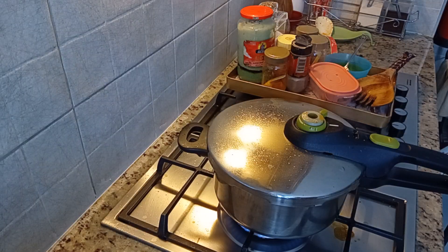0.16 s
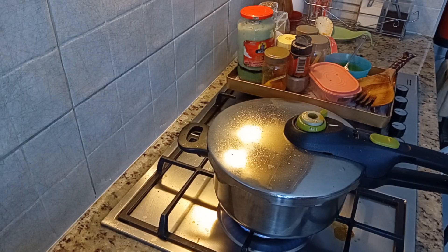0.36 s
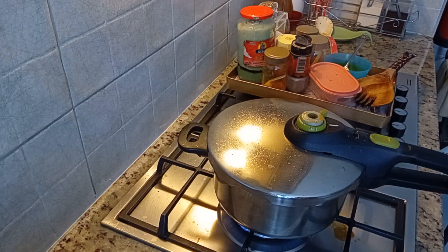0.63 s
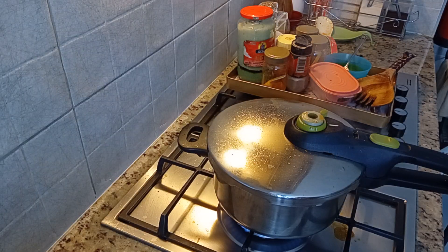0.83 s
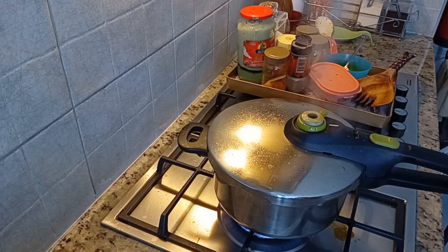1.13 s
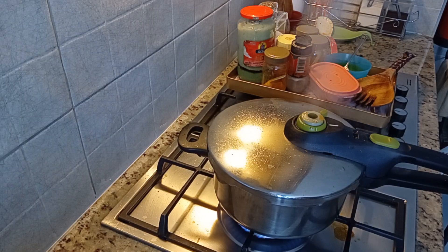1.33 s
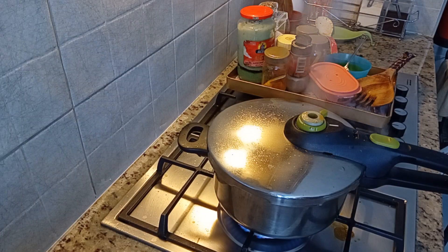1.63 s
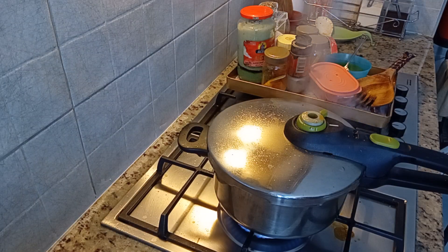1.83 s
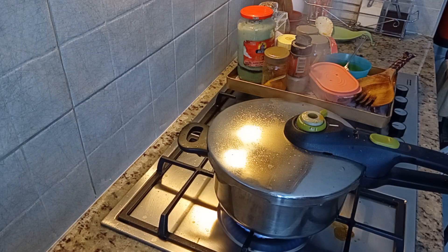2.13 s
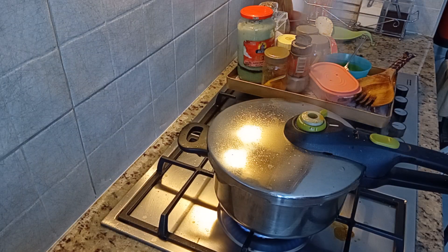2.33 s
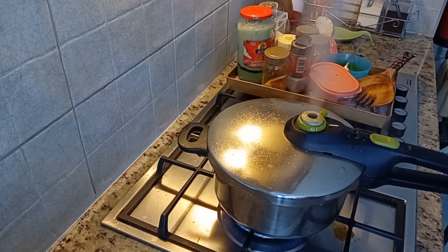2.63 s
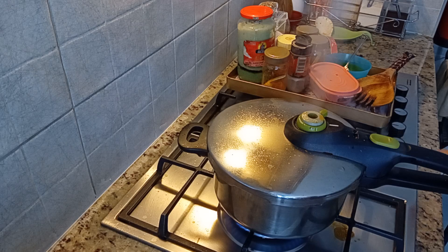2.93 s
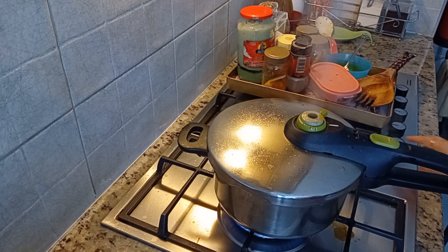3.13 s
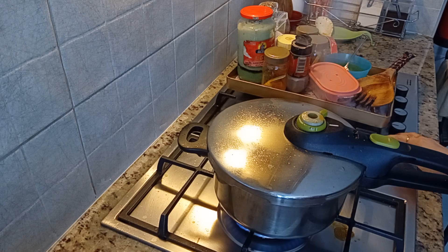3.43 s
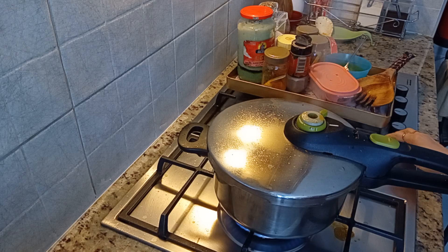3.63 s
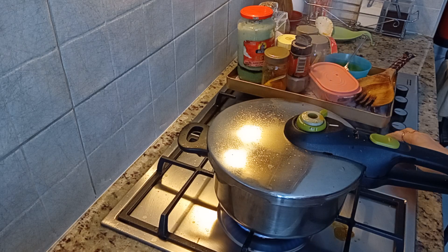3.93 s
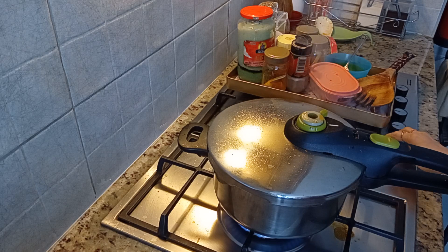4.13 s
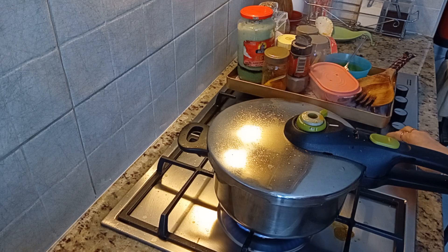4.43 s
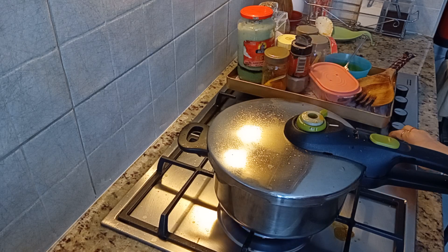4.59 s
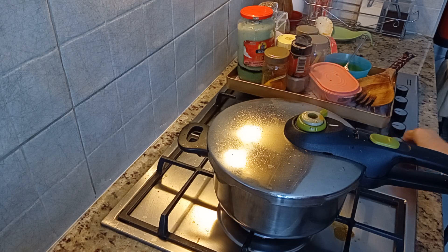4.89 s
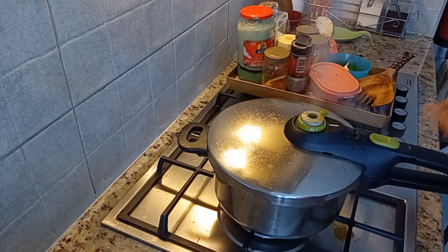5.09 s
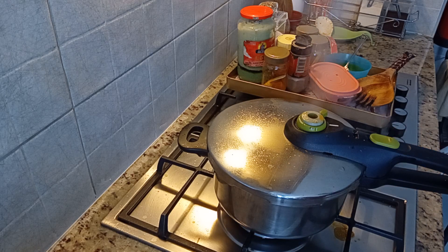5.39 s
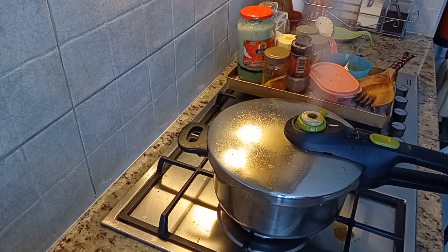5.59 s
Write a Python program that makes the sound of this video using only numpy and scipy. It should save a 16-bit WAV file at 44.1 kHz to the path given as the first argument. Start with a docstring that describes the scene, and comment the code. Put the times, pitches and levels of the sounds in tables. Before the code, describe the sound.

Close in a tiled kitchen, one microphone picks up a pressure cooker venting a constant, very bright hiss. Faint high tones flicker at first, a tiny rough squeak comes near one second, then a thin, trembling whistle locks in and keeps swelling and fading. Near the end it sinks while a weak breathy tone climbs. The gas flame murmurs very quietly below, with a few soft low bumps.

```python
"""Steam hisses from a pressure cooker on a gas hob in a tiled kitchen corner, heard by one microphone. The jet
is coloured noise ringing the valve cavity and lid; thin edge tones waver and beat with their echoes. The burner
murmurs underneath as low noise, with a faint hum and soft bumps. Brief swelling sines are other valve
resonances, low gurgles and the dying tail of one faint squeak of partials and rasping air. The unsteady main
whistle then locks in, throbs most when the jet is upset, and sinks as a breathy tone climbs."""
import sys
import numpy as np
from scipy import signal
from scipy.fft import rfft, irfft
from scipy.io import wavfile
from scipy.ndimage import uniform_filter1d

SR = 44100
rng = np.random.default_rng(int(sys.argv[2]) if len(sys.argv) > 2 else 0)


def waveform_to_disk(signal):
    """Save audio, clipped to [-1, 1], as 16-bit WAV at the path in sys.argv[1]."""
    frames = np.transpose(np.atleast_2d(signal))
    scaled = np.clip(frames, -1, 1) * 32767
    samples = np.round(scaled).astype(np.int16)
    wavfile.write(sys.argv[1], SR, samples)


N = 253575
TIME = np.arange(N) / SR  # s
FREQ = np.maximum(np.fft.rfftfreq(N, 1 / SR), 1)  # Hz, kept above zero for the logarithm


def undb(db):
    """Decibels to gain."""
    return 10 ** (np.asarray(db) / 20)


def unit(x):
    """Scale to rms 1."""
    return x / np.sqrt(np.mean(x ** 2))


def curves(rows):
    """Each column of a control table after the time, joined by straight lines, sample by sample."""
    s, *columns = np.transpose(rows)
    return [np.interp(TIME, s, column) for column in columns]


def shaped_noise(gain):
    """White noise with its spectrum multiplied by a gain curve, rms 1."""
    return unit(irfft(rfft(rng.standard_normal(N)) * gain, N))


def walk(rate):
    """Smooth chance motion of rms 1, up to about rate changes a second."""
    return shaped_noise(1 / (1 + (FREQ / rate) ** 4))


def noise(points, modes=()):
    """Turbulence of rms 1 with a broad colour and optional narrow peaks and dips."""
    hz, db = np.transpose(points)
    colour = np.interp(np.log(FREQ), np.log(hz), db)
    for centre, width, lift in modes:
        colour = colour + lift / (1 + (2 * (FREQ - centre) / width) ** 2)
    return shaped_noise(undb(colour))


def ringing(hz, width):
    """Turbulence ringing in one narrow resonance, rms 1."""
    return shaped_noise(1 / (1 + ((FREQ - hz) / (0.65 * width)) ** 2))


def swell(middle, length):
    """A smooth bell-shaped rise and fall, at 0.61 of its peak half a length either side."""
    return np.exp(-2 * ((TIME - middle) / length) ** 2)


def tiles(x, db, count=6):
    """A few discrete reflections off the wall and counter, 2-14 ms late, comb the hiss."""
    lags = rng.integers(SR // 500, SR // 70, count)
    echoes = sum(np.roll(x, lag) for lag in lags) / np.sqrt(count)
    return (x + undb(db) * echoes) / np.hypot(1, undb(db))


def kitchen(x, early_db, late_db, t60, early_s=0.01):
    """Direct sound, a quick cluster of echoes from tiles and lid, and the room's tail."""
    t = TIME[:SR // 2]
    early, late = rng.standard_normal((2, len(t))) * (t > .001)
    early = early * np.exp(-t / early_s)
    late = late * undb(-60 * t / t60)
    response = undb(early_db) * early / np.linalg.norm(early)
    response += undb(late_db) * late / np.linalg.norm(late)
    response[0] = 1  # the direct path
    return signal.fftconvolve(x, response / np.linalg.norm(response))[:N]


def edge_tone(rows, waver, waver_rate, echo_db, partials=((1, 0),), throb=1, wander=0.002197):
    """Vortex tone whose pitch wanders and trembles with the turbulence; its echoes beat with it."""
    hz, db = curves(rows)
    # waver and wander are shares of the pitch
    pitch = hz * (1 + waver * walk(waver_rate) + wander * walk(13.86))
    phase = 2 * np.pi * np.cumsum(pitch) / SR
    source = sum(undb(partial_db) * np.sin(k * phase) for k, partial_db in partials)
    tone = kitchen(throb * source, echo_db, late_db=-6.0, t60=0.54)
    # the quick beats stay, while the slow loudness follows the blowing strength
    tone = tone / np.sqrt(uniform_filter1d(tone ** 2, size=2200) + 1e-9)
    during = (TIME >= rows[0][0]) & (TIME <= rows[-1][0])
    sounding = uniform_filter1d(1. * during, size=900)  # 20 ms fades
    return tone * sounding * undb(db)


def steam(patchy_db=3):
    """Jet noise and two cavity resonances flutter with the flow; the lid's resonances come and go."""
    # steam flow: (time [s], base jet level [dB], base cavity hiss level [dB])
    flow = [(0, -46.5, -36.5), (.8, -46, -36.5), (1.3, -46, -36.5), (2.1, -44, -37), (2.6, -44.5, -36.5),
            (3.4, -45, -36.5), (4.2, -45, -36.5), (5, -44, -36.5), (5.75, -45.5, -36)]
    # spectrum of the open jet: (frequency [Hz], relative level [dB per Hz])
    jet_colour = [(350, -24), (700, -16.5), (950, -9.5), (1200, -8.5), (1550, -9.5), (2200, -10.5),
                  (2500, -6), (3100, -7), (4000, -6.5), (5000, 0.5), (5700, 1.5), (6600, 7), (8300, -5),
                  (11000, -41)]
    # broad main resonance of the valve cavity: (frequency [Hz], relative level [dB per Hz])
    cavity_colour = [(7800, -56), (8600, -17.5), (9050, -7.5), (9200, 1), (9500, 2.5), (10400, 3),
                     (11100, -1.5), (11850, -7.5), (12150, -16.5), (13900, -20), (16000, -10.5)]
    # fine peaks and dips of the cavity: (centre [Hz], width [Hz], lift [dB])
    cavity_modes = [(9570, 110, 5.5), (10310, 96, 6), (10320, 33, -14), (11540, 25, -18), (11850, 120, -7),
                    (12450, 260, 7.5), (11800, 80, 1)]
    # upper resonance of the valve cavity: (frequency [Hz], relative level [dB per Hz])
    sizzle_colour = [(12500, -45), (14000, -19), (14500, -7.5), (15100, -1), (15700, 0)]
    # narrow resonances of lid and valve: (centre [Hz], nominal width [Hz], relative level [dB])
    lid_modes = [(745, 38, -78.5), (961, 170, -68.5), (1135.4, 24, -68.5), (1916, 54, -67.5),
                 (2414, 47, -65.5), (3398, 40, -63), (3890, 48, -62), (4168, 48, -62), (5140, 80, -61.5),
                 (6780, 77, -56)]
    jet_db, cavity_db = curves(flow)
    jet = noise(jet_colour) * undb(jet_db + .5 * walk(16))
    cavity = noise(cavity_colour, cavity_modes) * undb(cavity_db + 0.56 * walk(25))
    # the upper resonance is the less steady one
    sizzle = noise(sizzle_colour) * undb(cavity_db + 0.5 + 1.1 * walk(22))
    lid = sum(ringing(hz, width) * undb(db + patchy_db * walk(12.7)) for hz, width, db in lid_modes)
    return tiles(jet + cavity + sizzle, db=-9.5) + undb(-2.5) * lid


def early_tones(locks_in):
    """Weak edge tones drift apart until the main whistle locks in."""
    # (first pitch [Hz], last pitch [Hz], first base level [dB], last base level [dB])
    drifts = [(4850, 4720, -57.5, -53.5), (6580, 6880, -51, -49.5)]
    tones = 0
    for hz0, hz1, db0, db1 in drifts:
        rows = [(0, hz0, db0), (locks_in, hz1, db1)]
        flicker = undb(3.6 * walk(8.6))
        tones = tones + flicker * edge_tone(rows, waver=0.00494, waver_rate=58, echo_db=4.0)
    return tones


def unrest(onset_s=0.0303):
    """How upset the jet is, 0-1: each upset comes quickly and dies away."""
    # (time [s], strength [0-1], settling time [s])
    upsets = [(1.25, 1, .55), (2.88, .6, 0.0994)]
    total = 0
    for s, size, settle in upsets:
        onset = np.clip((TIME - s) / onset_s + 1, 0, 1)
        total = total + size * onset * np.exp(-np.maximum(TIME - s, 0) / settle)
    return total


def main_whistle(rows, flicker_db=1.34):
    """The jet's strongest edge tone, split into side tones by the flapping of the jet."""
    # settled and fully upset jet: (pitch tremble [share of pitch], throb rate [Hz], throb depth [0-1])
    settled = (0.00473, 66, 0.42)
    wildest = (0.01204, 155, 0.88)
    upset = unrest()
    tremble, flap_hz, depth = (calm + (wild - calm) * upset for calm, wild in zip(settled, wildest))
    flap = 2 * np.pi * np.cumsum(flap_hz * (1 + 0.356 * walk(42.0))) / SR
    tone = edge_tone(rows, waver=tremble, waver_rate=62.6, echo_db=4, throb=1 + depth * np.sin(flap))
    return undb(0.9 + flicker_db * walk(18)) * tone


def whistles():
    """The main whistle and the weaker edge tones around it."""
    # main whistle: (time [s], pitch [Hz], relative level [dB])
    main_rows = [(1.24, 6460, -52), (1.28, 6230, -39.5), (1.45, 6000, -34), (1.68, 6430, -49),
                 (1.82, 6430, -46.5), (1.97, 6190, -35), (2.33, 6250, -37), (2.36, 6270, -44),
                 (2.42, 6160, -32), (2.76, 6154, -41.5), (2.81, 6310, -45), (2.9, 6210, -36),
                 (3.17, 6115, -45.5), (3.53, 6153, -32.5), (3.61, 6300, -48.5), (3.98, 6220, -36),
                 (4.0, 6120, -43), (4.1, 6240, -35.5), (4.47, 6230, -40), (4.48, 6236, -34),
                 (4.64, 6284, -44), (4.82, 6196, -35), (5.11, 6016, -41.5), (5.36, 6010, -41),
                 (5.46, 5910, -32.5), (5.59, 5840, -46.5), (5.69, 5825, -41), (5.75, 5803, -48)]
    # a faint falling tone: (time [s], pitch [Hz], level [dB])
    falling_rows = [(4.2, 4370, -64), (4.3, 4190, -56), (4.45, 4260, -54.5), (4.6, 4220, -59),
                    (4.78, 4200, -61), (4.85, 4150, -63)]
    # a breathy tone climbs as the main whistle sinks: (time [s], pitch [Hz], level [dB])
    rising_rows = [(5.17, 2767, -60), (5.3, 2976, -52.5), (5.45, 3210, -57), (5.6, 3345, -55),
                   (5.75, 3810, -54)]
    early = early_tones(locks_in=main_rows[0][0])
    main = main_whistle(main_rows)
    falling = edge_tone(falling_rows, waver=0.031, waver_rate=119, echo_db=-0.5)
    rising = edge_tone(rising_rows, waver=0.045, waver_rate=70, echo_db=4.0)
    return early + main + falling + rising


def hob():
    """The flame's unsteady murmur as low noise, a faint hum of sines and soft low bumps of noise."""
    # burner and room: (frequency [Hz], relative level [dB per Hz])
    burner_colour = [(20, -6.5), (43, -16), (92, 4.5), (125, -4.5), (162, 4.5), (215, -6.5), (300, -7),
                     (370, -3.5), (480, -6), (700, -12.5), (1500, -34.5)]
    # faint steady hum: (frequency [Hz], level [dB])
    hum_tones = [(253, -78), (366.5, -75.5)]
    # spectrum of a bump: (frequency [Hz], relative level [dB per Hz])
    bump_colour = [(20, -23), (38, -17), (52, -1), (70, -5.5), (92, 6), (130, -3.5), (220, -18), (600, -39)]
    # soft low bumps: (middle [s], length [s], relative level [dB])
    bump_times = [(0.38, 0.047, -59), (0.767, 0.037, -59), (1.13, 0.049, -68), (2.02, 0.041, -64),
                  (2.36, 0.034, -67), (2.65, 0.15, -65), (4.958, 0.047, -56), (5.302, 0.047, -61.5),
                  (5.5, 0.095, -51.5), (5.705, 0.067, -66)]
    flame = noise(burner_colour) * undb(-66.0 + 2.5 * walk(9.4))
    hum = 0
    for hz, db in hum_tones:
        phase = 2 * np.pi * hz * TIME + 0.69 * walk(5.5)
        hum = hum + undb(db) * np.sqrt(2) * np.sin(phase)
    bumps = noise(bump_colour) * sum(undb(db + 1.0) * swell(s, length) for s, length, db in bump_times)
    return flame + hum + bumps


def brief_tones(waver_hz=22, flicker_db=2.0):
    """Brief swelling tones: valve resonances the jet catches, low gurgles near 1 kHz and 530 Hz, and the
    squeak's dying tail near 1.8 kHz."""
    # (middle [s], pitch [Hz], length [s], base rms level at the peak [dB])
    tone_times = [(0.333, 3800, .1, -55), (0.457, 6690, 0.087, -44.5), (0.562, 4880, 0.069, -46.5),
                  (0.758, 6770, 0.052, -42), (0.912, 6800, 0.04, -36.5), (.95, 4730, .1, -48.5),
                  (1.087, 4730, 0.067, -41), (1.142, 1827, 0.2, -64), (1.207, 4730, 0.075, -38),
                  (1.274, 3960, 0.1, -55), (1.777, 955, 0.04, -58.5), (1.98, 1010, 0.06, -60),
                  (2.14, 972, 0.058, -60), (2.464, 2384, .076, -52.5), (2.56, 6860, .12, -51),
                  (2.896, 3410, 0.27, -59), (2.988, 2495, 0.062, -54), (3.005, 4950, .13, -51),
                  (3.288, 1090, .049, -54), (3.441, 3435, 0.073, -56), (4.44, 529, 0.056, -67),
                  (4.721, 3455, .15, -58), (4.969, 4670, .054, -51), (5.507, 3890, 0.11, -51.5)]
    drift = waver_hz * walk(110)
    tones = 0
    for s, hz, length, db in tone_times:
        phase = 2 * np.pi * np.cumsum(hz + drift) / SR
        tones = tones + undb(db) * swell(s, length) * np.sin(phase)
    return np.sqrt(2) * tones * undb(flicker_db * walk(60))


def squeak():
    """A short, rough squeak of upper partials with a rasp of air, ringing on in the room."""
    # (time [s], fundamental pitch [Hz], level [dB])
    squeak_rows = [(.84, 418, -60), (.9, 426, -54), (.95, 444, -50.5), (.99, 455, -48.5), (1.04, 449, -49),
                   (1.08, 432, -68)]
    # the partials that sound: (multiple of the fundamental, relative level [dB])
    squeak_partials = [(3, -13), (4, 2), (5, -9), (6, -6)]
    _, db = curves(squeak_rows)
    tone = edge_tone(squeak_rows, waver=0.014, waver_rate=130, echo_db=-5.5, partials=squeak_partials)
    during = (TIME > squeak_rows[0][0]) & (TIME < squeak_rows[-1][0])
    rasp = ringing(2330, width=680) * undb(db - 2.5) * during
    return kitchen(tone + rasp, early_db=0, late_db=-5, t60=.7)


def scene():
    """Everything reaches one microphone, the same on both channels."""
    mono = steam() + whistles() + hob() + brief_tones() + squeak()
    return np.array([mono, mono])


def record(dry):
    """The recorder cuts the top steeply, over the last 60 Hz below its limit."""
    top_hz = 15760
    return irfft(rfft(dry) * np.clip((top_hz - FREQ) / 60, 0, 1), N)


dry = scene()
out = record(dry)
waveform_to_disk(out)
```